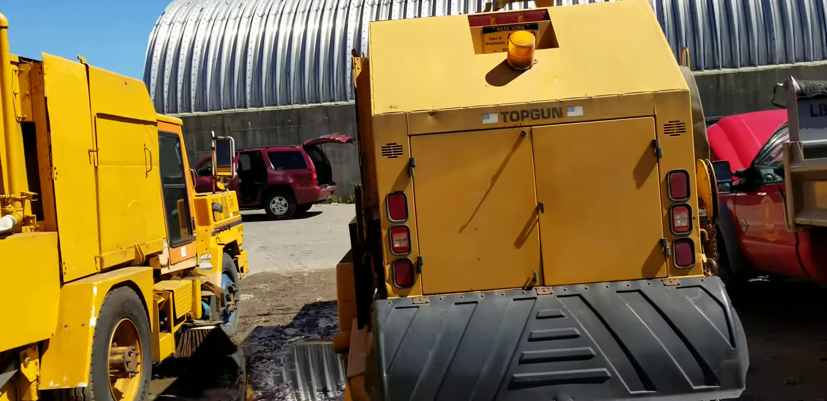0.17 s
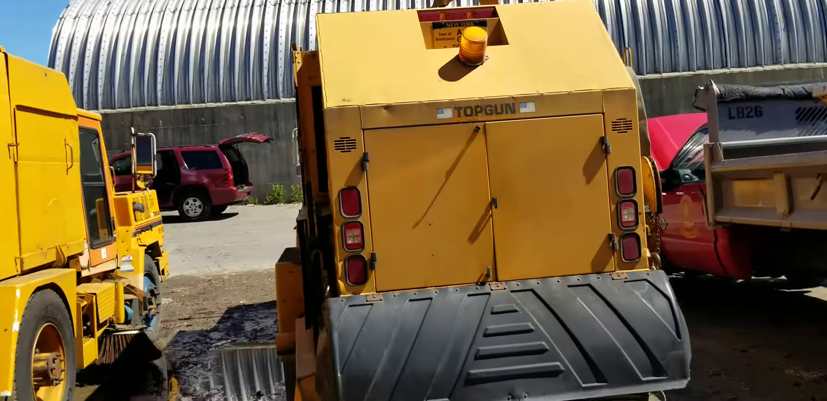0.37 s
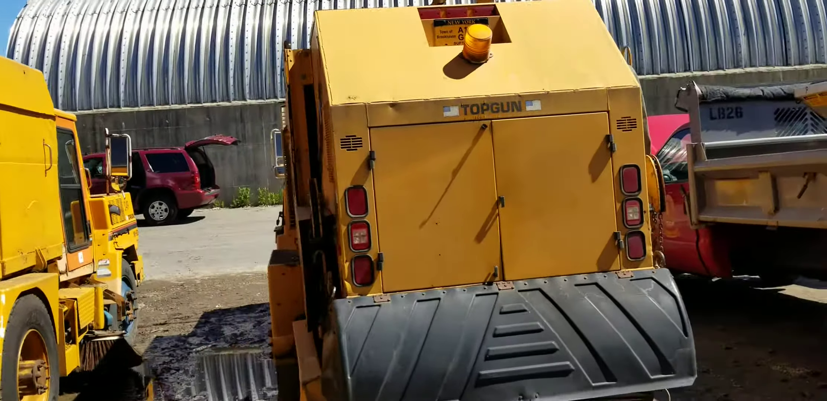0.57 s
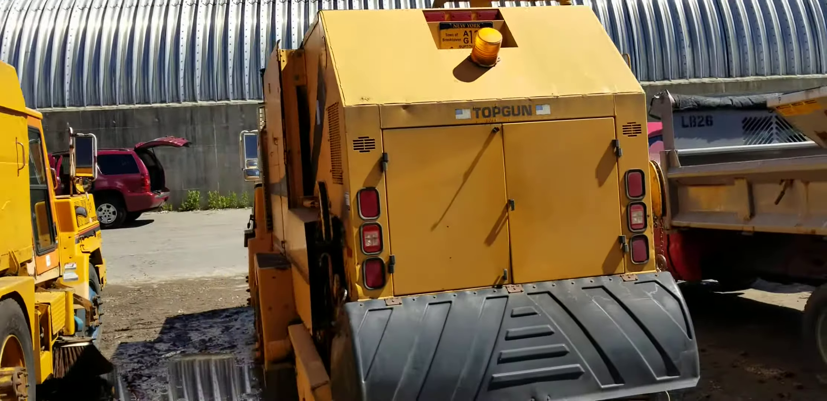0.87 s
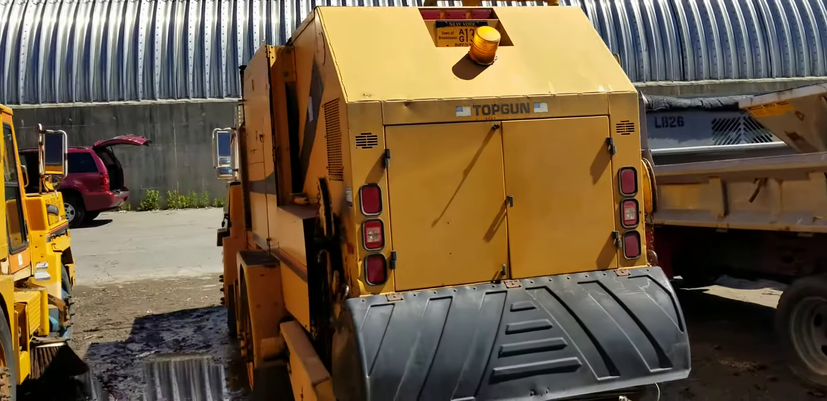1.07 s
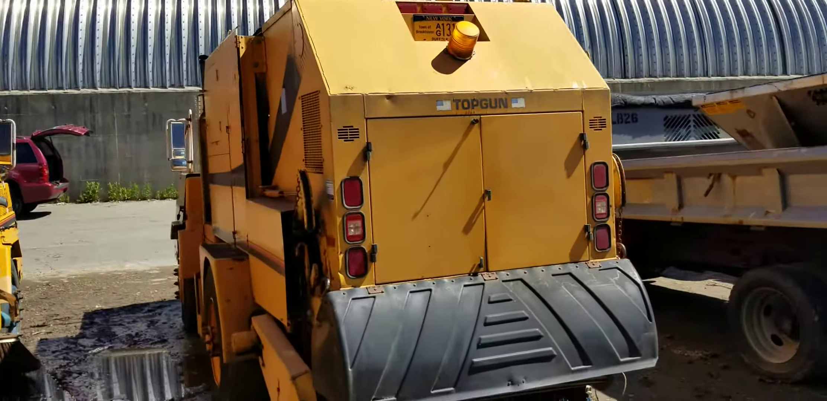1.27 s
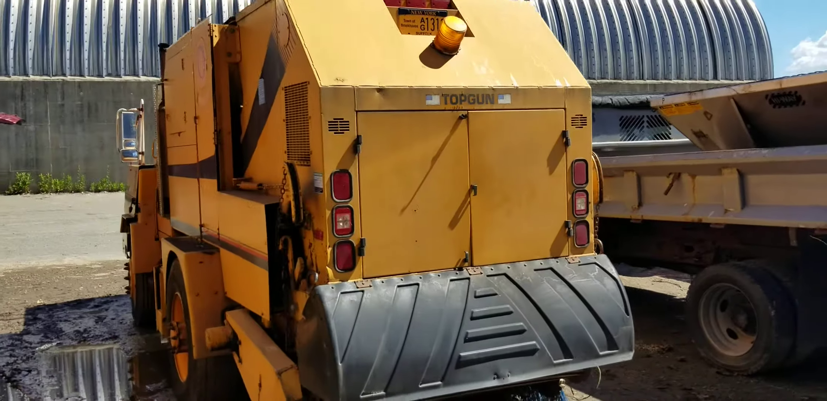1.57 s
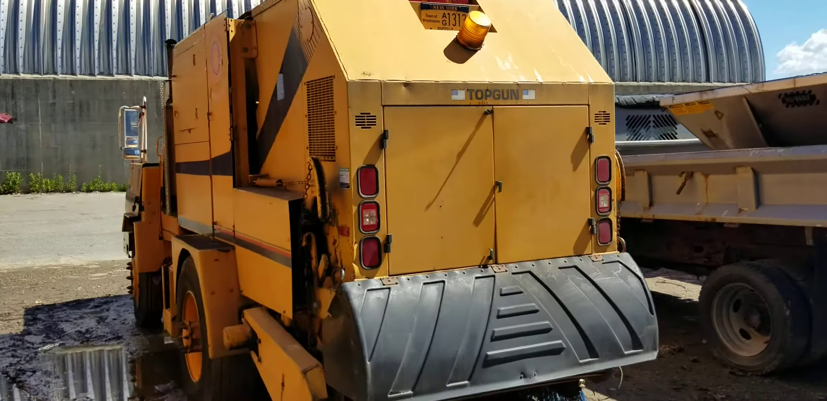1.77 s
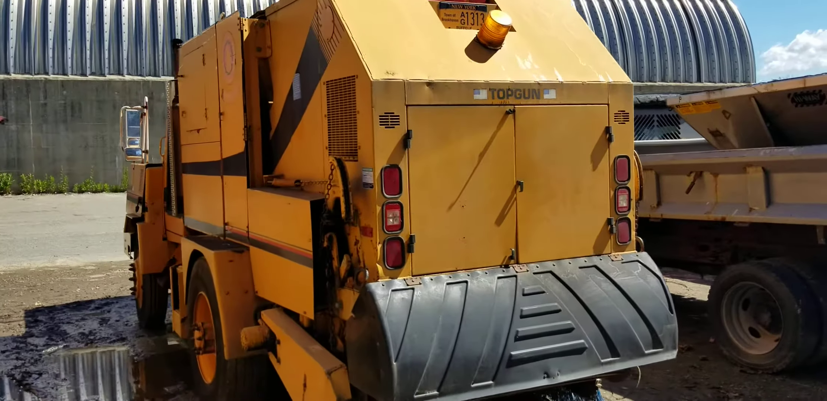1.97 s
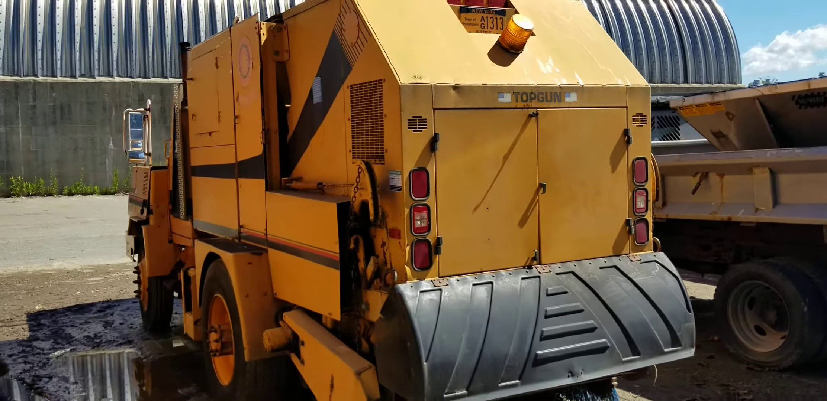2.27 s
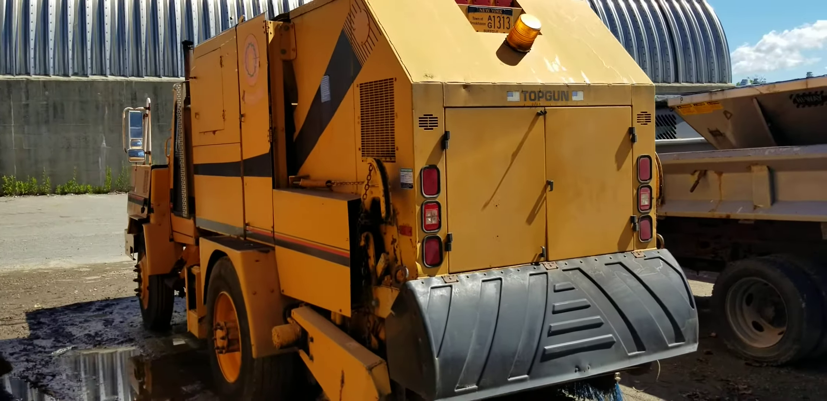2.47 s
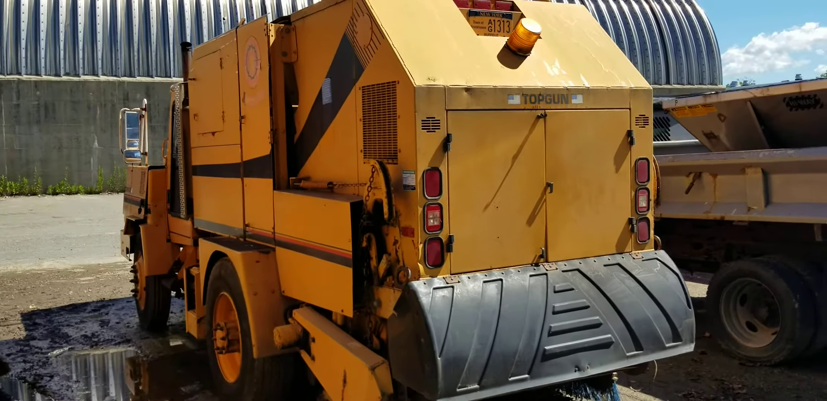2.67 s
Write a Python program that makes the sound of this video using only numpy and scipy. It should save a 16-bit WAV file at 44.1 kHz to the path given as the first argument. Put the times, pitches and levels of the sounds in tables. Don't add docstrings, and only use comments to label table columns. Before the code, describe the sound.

Low droning diesel idle of heavy sweeper trucks outdoors, with rattling panels and brief air hisses

```python
import sys
import numpy as np
from scipy import signal
from scipy.fft import rfft, irfft
from scipy.io import wavfile
from scipy.ndimage import uniform_filter1d

SR = 44100
rng = np.random.default_rng(int(sys.argv[2]) if len(sys.argv) > 2 else 0)


def file_out(sig):
    cols = np.atleast_2d(sig).T
    lim = np.clip(cols, -1, 1)
    pcm = np.round(lim * 32767).astype(np.int16)
    wavfile.write(sys.argv[1], SR, pcm)


def to_linear_factor(level_db):
    exponent = np.asarray(level_db, float) / 20
    return 10 ** exponent


N = 123921
T, HZ = np.arange(N) / SR, np.fft.rfftfreq(N, 1 / SR)


def evened(x):
    return x / np.sqrt(np.mean(abs(x) ** 2) + 1e-20)


def read(points, hz=HZ):
    f, value = np.transpose(points)
    return np.interp(np.log(hz + 1), np.log(f + 1), value)


def drift(top_hz, count):
    f = np.geomspace(top_hz / 10, top_hz, 12)[:, None]
    coarse = T[::128]
    curves = []
    for phase in rng.random((count, 12)):
        sines = np.sin(2 * np.pi * (f * coarse + phase[:, None])) / np.sqrt(f)
        curves.append(np.interp(T, coarse, evened(sines.sum(0))))
    return np.array(curves)


def resonate(x, hz, width_hz):
    turn = np.exp(2j * np.pi * np.cumsum(hz) / SR)
    r = np.exp(-np.pi * width_hz / SR)
    return (turn * signal.lfilter([1 - r], [1, -r], x / turn)).real


def coloured(x, points):
    low_edge = np.minimum(HZ / points[0][0], 1) ** 4
    high_edge = np.minimum(points[-1][0] / (HZ + 1), 1) ** 2
    return evened(irfft(rfft(x) * to_linear_factor(read(points)) * low_edge * high_edge, N))


# (start level [dB], middle level [dB], end level [dB])
ORDERS_DB = [(-42, -43, -44), (-52, -52, -52), (-45, -41, -46), (-44, -48, -50), (-39, -43, -43),
             (-30, -31.5, -31), (-32, -36, -42), (-33, -35, -44), (-42, -41, -35), (-24, -24, -24),
             (-32, -34, -40), (-44, -46, -45), (-40, -39, -43), (-48, -48, -46), (-43, -44, -47),
             (-48, -41, -42), (-48, -40, -41), (-53, -53, -56), (-47, -42, -44), (-47, -43, -58),
             (-50, -43, -42), (-39, -43, -47), (-56, -53, -55), (-59, -57, -56), (-51, -49, -59),
             (-60, -60, -60), (-63, -60, -63), (-61, -60, -60), (-55, -54, -57), (-49, -50, -59),
             (-61, -60, -64), (-55, -50, -56), (-61, -57, -64), (-49, -58, -52)]
LOWEST, BOOM_ORDER = 4, 13
# (time [s], cycle rate [Hz], lift [dB])
IDLE = [(0, 9.77, 0), (.28, 9.7, 0), (.47, 9.57, 3), (.65, 9.51, 4), (1.03, 9.72, 1), (1.22, 9.84, -2),
        (1.4, 9.9, -4), (1.6, 9.79, -2), (1.78, 9.66, -1), (1.97, 9.55, -3), (2.16, 9.66, -4),
        (2.3, 9.76, 2), (2.53, 9.87, 2), (2.8, 9.8, 2)]
WANDER_DB, WANDER_HZ, WANDER_FALL_DB = -49, 2, .35
SLIP_RAD, UNEVEN_DB = .45, 2


def drone():
    s, rate_hz, boom_db = np.transpose(IDLE)
    cycle = 2 * np.pi * np.cumsum(np.interp(T, s, rate_hz)) / SR
    loose = drift(WANDER_HZ, count=2 * len(ORDERS_DB))
    start = rng.random((2, len(ORDERS_DB), 1))
    sway = drift(5, count=len(ORDERS_DB))
    out = np.zeros((2, N))
    for k, walk_db in enumerate(ORDERS_DB):
        order = k + LOWEST
        level_db = np.interp(T / T[-1], [0, .5, 1], walk_db)
        if order == BOOM_ORDER:
            level_db = level_db + np.interp(T, s, boom_db)
        else:
            level_db = level_db + UNEVEN_DB * sway[k]
        wander = (loose[2 * k] + 1j * loose[2 * k + 1]) / np.sqrt(2)
        size = to_linear_factor(level_db) + to_linear_factor(WANDER_DB - WANDER_FALL_DB * k) * wander
        phase = order * cycle + SLIP_RAD * sway[-1 - k] + 2 * np.pi * start[:, k]
        out += (np.sqrt(2) * size * np.exp(1j * phase)).real
    return out


FIRING_HZ, FIRST_S = 46.5, 0.0097
QUICKEN_S, QUICKEN_HZ = 1.5, .43
KNOCK_S, KNOCK_SPREAD_DB = .004, 2


def knocks(cylinders_db=(0,)):
    turns = (T - FIRST_S) * FIRING_HZ + QUICKEN_HZ * np.maximum(T - QUICKEN_S, 0) + 1
    blow_db = KNOCK_SPREAD_DB * rng.standard_normal(200) + np.resize(cylinders_db, 200)
    size = to_linear_factor(blow_db)[turns.astype(int)]
    u = (turns % 1) / FIRING_HZ / KNOCK_S
    return size * u * np.exp(1 - u)


THUMP = [-35.5, -47, -50, -51, -52]
# (far pitch [Hz], near pitch [Hz], width [Hz], far level [dB], near level [dB])
HOUSING = [
    (585, 615, 198, -45.5, -49),
    (1212, 1130, 440, -43, -41.5),
    (1686, 1647, 250, -45.5, -43.5),
    (2497, 2516, 230, -52.5, -52.5),
    (4130, 4130, 850, -55, -55.5),
    (6900, 6800, 1300, -68, -66),
]
KNOCK_SHARE = [.15, .8, 1, .25, .2, .2]
CYLINDERS_DB = {1: [-8, 1, -4, 3, -12, 0, 2, -2], 2: [5, -5, 3, -4, -3, -7, -9, -3]}
THUMP_SWAY_DB, KNOCK_DEPTH = 1.8, .9
RING = .2
CORNER_S, CORNER_WIDTH_S, CORNER_SHARE = 1.93, .1, .65


def second_engine(knock):
    sway = drift(3.95, count=len(THUMP))
    out = np.zeros((2, N))
    for k, db in enumerate(THUMP):
        phase = 2 * np.pi * ((k + 1) * FIRING_HZ * T + rng.random((2, 1)))
        out += np.sqrt(2) * to_linear_factor(db + THUMP_SWAY_DB * sway[k]) * np.cos(phase)
    corner = 1 / (1 + np.exp((CORNER_S - T) / CORNER_WIDTH_S))
    near = (1 - CORNER_SHARE) * T / T[-1] + CORNER_SHARE * corner
    for k, (far_hz, near_hz, width_hz, far_db, near_db) in enumerate(HOUSING):
        blows = knocks(CYLINDERS_DB[k]) if k in CYLINDERS_DB else knock
        rattle = 1 + KNOCK_DEPTH * KNOCK_SHARE[k] * (0.56 + near) * blows
        drive = rng.standard_normal((2, N)) * rattle
        hz = far_hz + (near_hz - far_hz) * near
        if k in CYLINDERS_DB:
            ring_phase = 2 * np.pi * np.cumsum(hz) / SR + [[0], [np.pi / 2]]
            drive = drive + RING * (.15 + near) * blows * np.cos(ring_phase)
        ringing = resonate(resonate(drive, hz, 2 * width_hz), hz, width_hz)
        out += to_linear_factor(far_db + (near_db - far_db) * near) * evened(ringing)
    return out


# (frequency [Hz], level [dB])
ROAR = [(32, -22), (45, -12), (130, -10), (200, -15), (290, -16.5), (400, -15.5), (700, -24), (1700, -27),
        (4000, -42)]
ROAR_DB, ROAR_GROWS_DB_PER_S, ROAR_KNOCK = -35.5, 1, 0.12


def roar(knock):
    swell_db = ROAR_DB + ROAR_GROWS_DB_PER_S * T + 0.5 * drift(11, count=1)
    pulse = 1 + ROAR_KNOCK * (knock - .5)
    return to_linear_factor(swell_db) * pulse * coloured(rng.standard_normal((2, N)), ROAR)


# (frequency [Hz], density [dB per Hz])
FIZZ = [(1760, -0.5), (3000, -2.5), (3660, -6), (4260, -10.5), (5660, -12), (7010, -12), (8980, -21.5),
        (12400, -15.5), (15600, -22.5)]
# (frequency [Hz], level [dB])
WHINES = [
    (420, -51),
    (1290, -56),
]
FIZZ_DB, FIZZ_FLICKER_DB = -48.5, .4


def fizz(knock):
    flicker = drift(20, count=3)
    tones = np.zeros(N)
    for k, (hz, db) in enumerate(WHINES):
        phase = 2 * np.pi * hz * T + 0.15 * flicker[2 - k]
        tones += to_linear_factor(db + 1.1 * flicker[k + 1]) * np.sin(phase)
    size = to_linear_factor(FIZZ_DB + FIZZ_FLICKER_DB * flicker[0]) * (1 + 0.33 * knock)
    return tones + size * coloured(rng.standard_normal((2, N)), FIZZ)


# (time [s], peak level [dB], pitch [Hz])
TICKS = [(.0605, -40, 11000), (.0605, -46, 6000), (.105, -46, 7000), (.216, -47, 12500), (.226, -45, 11900),
         (.398, -46, 5500), (.415, -40, 6200), (.43, -47, 6900), (.447, -48, 12500), (.456, -44, 7600),
         (.49, -47, 5600), (.545, -48, 9500), (.577, -47, 9000), (.771, -38, 12500), (1.11, -44, 7000),
         (1.153, -47, 10500), (1.17, -46, 8600), (1.25, -40, 5700), (1.258, -45, 7000), (1.2725, -41, 8600),
         (1.2725, -43, 12800), (1.287, -45, 12500), (1.323, -48, 10200), (1.388, -46, 6500),
         (1.404, -42, 6300), (1.404, -47, 10000), (1.424, -46, 13500), (1.425, -48, 8500),
         (1.448, -47, 12400), (1.496, -49, 13500), (1.504, -46, 7200), (1.504, -48, 12300),
         (1.519, -44, 14000), (1.528, -46, 12800), (1.534, -43, 6500), (1.535, -47, 13500),
         (1.548, -46, 13500), (1.56, -44, 7500), (1.56, -48, 11500), (1.569, -47, 11000),
         (1.573, -43, 6800), (1.603, -49, 12500), (1.745, -47, 13000), (1.78, -42, 8400),
         (2.035, -45, 6500), (2.078, -45, 7200), (2.128, -45, 12000), (2.152, -36, 2300),
         (2.163, -37, 3300), (2.172, -36, 2500), (2.18, -38, 3600), (2.197, -43, 7300), (2.35, -51, 14500),
         (2.5, -44, 5400), (2.65, -48, 8200), (2.68, -43, 12000)]
TICK_S, GRIT_PER_S, GRIT_DB, TICK_PAN_DB = .0005, 110, -59, 3


def grit():
    t = np.arange(200) / SR
    out = np.zeros((2, N + 200))
    small = rng.random((round(GRIT_PER_S * T[-1]), 3))
    scattered = [(a * T[-1], GRIT_DB + 7 * b, 6000 + 9000 * c) for a, b, c in small]
    snap = t / TICK_S * np.exp(1 - t / TICK_S)
    for s, db, hz in [*TICKS, *scattered]:
        roughness = uniform_filter1d(rng.standard_normal((2, 200)), 12)
        chirp = np.cumsum(1 + .7 * roughness, 1)
        first = int(s * SR)
        out[:, first:first + 200] += to_linear_factor(db + 0.5) * snap * np.sin(2 * np.pi * hz * chirp / SR)
    return out[:, :N] * to_linear_factor([[TICK_PAN_DB / 2], [-TICK_PAN_DB / 2]])


# (time [s], level [dB])
LONG_VENT = [
    (.768, -77),
    (.773, -52.5),
    (.845, -49),
    (.875, -41.5),
    (.94, -42.5),
    (.965, -44),
    (1.015, -42.5),
    (1.05, -52.5),
    (1.3, -68),
]
# (time [s], level [dB])
SHORT_HISSES = [
    [(1.4, -78), (1.53, -59.5), (1.565, -60), (1.6, -68)],
    [(1.98, -67), (2.06, -59.5), (2.12, -60), (2.14, -52), (2.16, -47.5), (2.2, -62), (2.23, -62)],
]
# (frequency [Hz], density [dB per Hz])
JET = [(1000, -8), (2000, -5.5), (2800, -5), (5000, -10), (7200, -5), (8600, -14), (12000, -10),
       (15800, -13.5)]
JET_PAN_DB, SPUTTER_DB = 2, 2
JET_BODY_HZ, JET_BODY_S = 7600, 0.01


def hisses():
    flow = np.zeros(N)
    for vent in [LONG_VENT, *SHORT_HISSES]:
        s, db = np.transpose(vent)
        flow += to_linear_factor(np.interp(T, s, db, left=-120, right=-120))
    sputter = evened(uniform_filter1d(rng.standard_normal(N), 220))
    jet = coloured(rng.standard_normal((2, N)), JET)
    body = irfft(rfft(jet) / (1 + (HZ / JET_BODY_HZ) ** 8), N)
    keep = np.exp(-1 / (JET_BODY_S * SR / 2))
    lagging = signal.lfilter([1 - keep], [1, -keep], flow)
    hiss = lagging * body + flow * (jet - body)
    return to_linear_factor(7.5 + SPUTTER_DB * sputter) * hiss * to_linear_factor([[JET_PAN_DB / 2], [-JET_PAN_DB / 2]])


# (frequency [Hz], likeness [0-1])
SAME = [(200, .994), (300, .94), (600, .78), (1200, .5), (2500, .3), (8000, .3)]
# (frequency [Hz], phase [rad])
LEAD = [(30, .07), (130, .12), (300, .25), (700, .6), (1500, 2.2), (3000, 1.9), (8000, 1.6)]
# (frequency [Hz], level difference [dB])
TILT = [(250, 0), (380, .9), (700, -.2), (1290, -5.5), (2380, -5), (4400, -1.5), (8120, 0), (15000, 3.5)]


def ports(pair):
    a, b = rfft(pair)
    same = np.clip(read(SAME), 0, 1)
    right = same * a * np.exp(-1j * read(LEAD)) + np.sqrt(1 - same ** 2) * b
    return irfft(np.array([a, right]) * to_linear_factor(np.outer([.5, -.5], read(TILT))), N)


def scene():
    knock = knocks()
    yard = drone() + second_engine(knock) + roar(knock) + fizz(knock) + hisses()
    return ports(yard) + grit()


def top_cut(x):
    return signal.sosfilt(signal.butter(12, 15910, fs=SR, output="sos"), x)


EDGE_HZ = 15860


def record(dry):
    slope = np.clip((EDGE_HZ - HZ) / 30 + 1, 0, 1)
    limited = irfft(rfft(dry) * slope, N)
    return top_cut(limited)


dry = scene()
out = record(dry)
file_out(out)
```